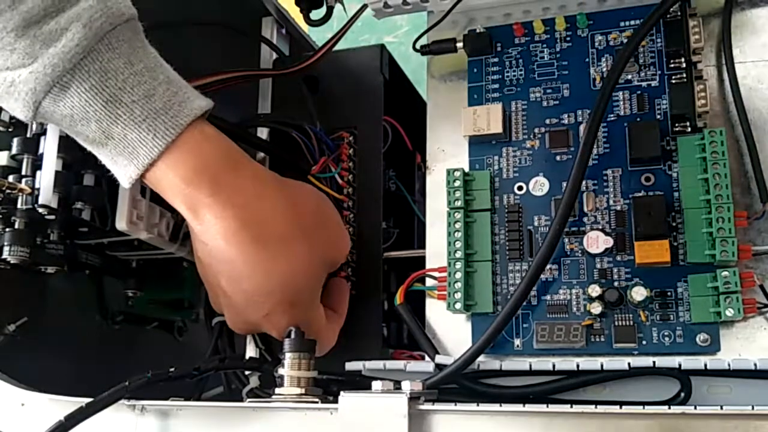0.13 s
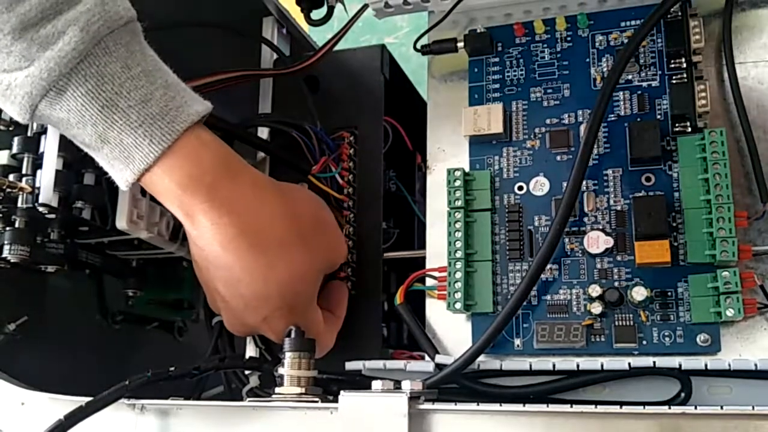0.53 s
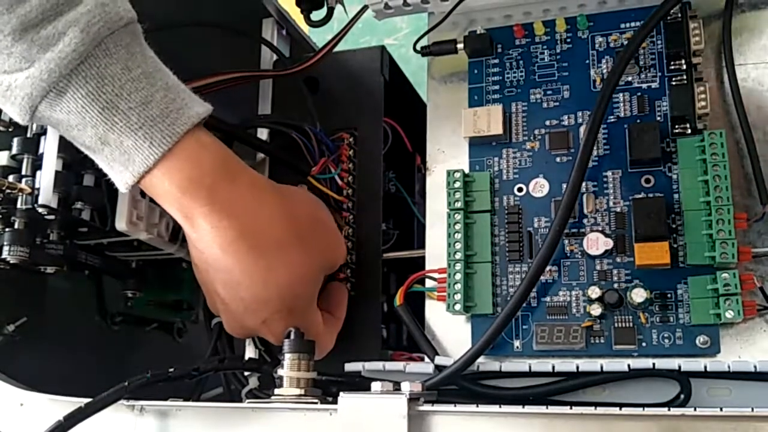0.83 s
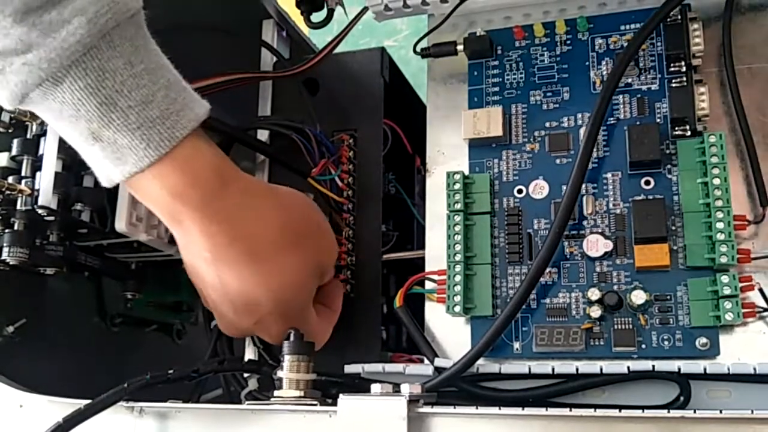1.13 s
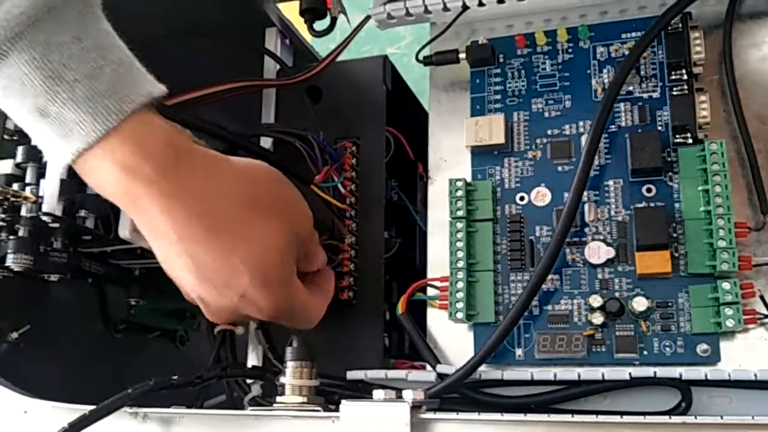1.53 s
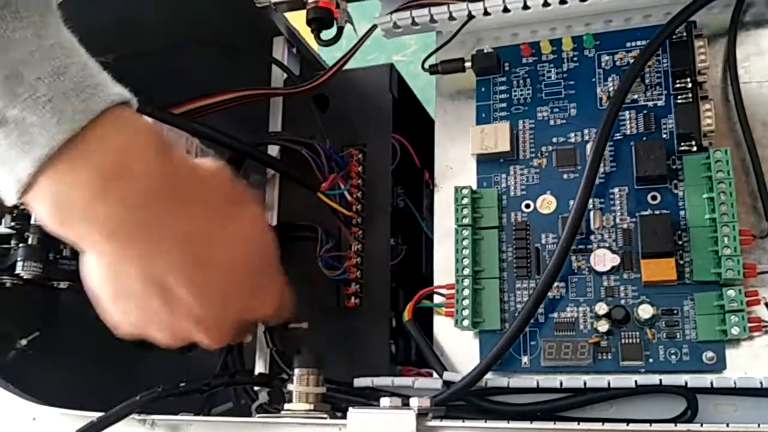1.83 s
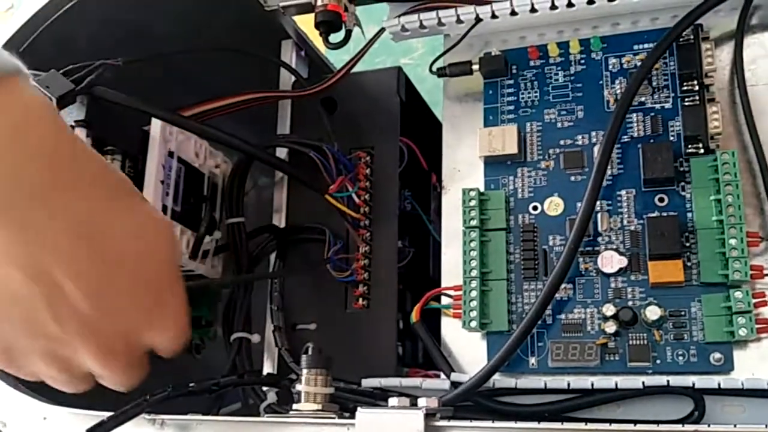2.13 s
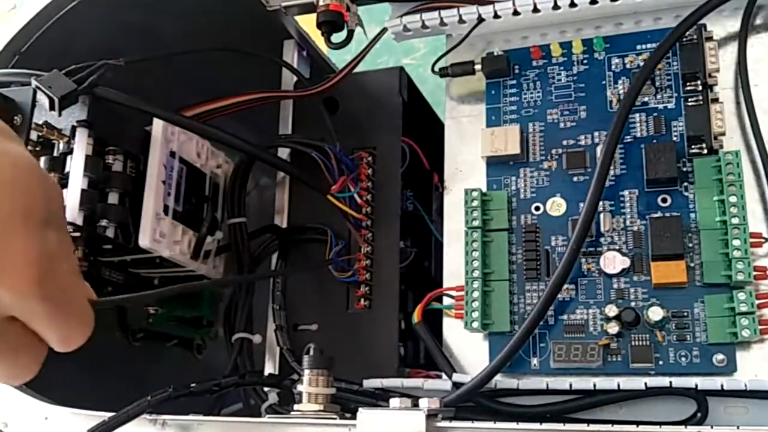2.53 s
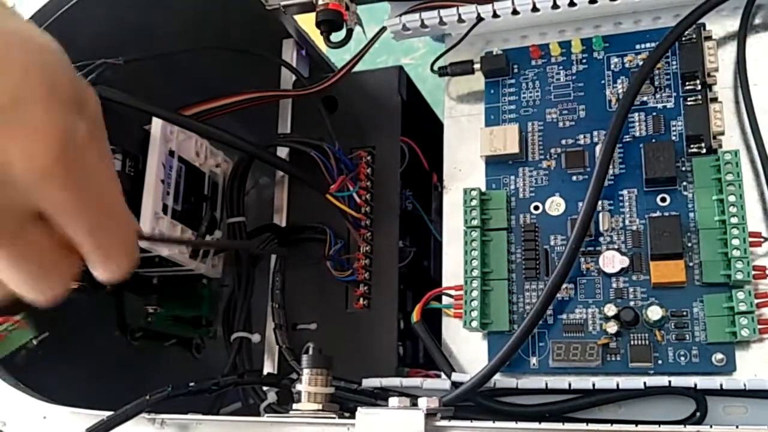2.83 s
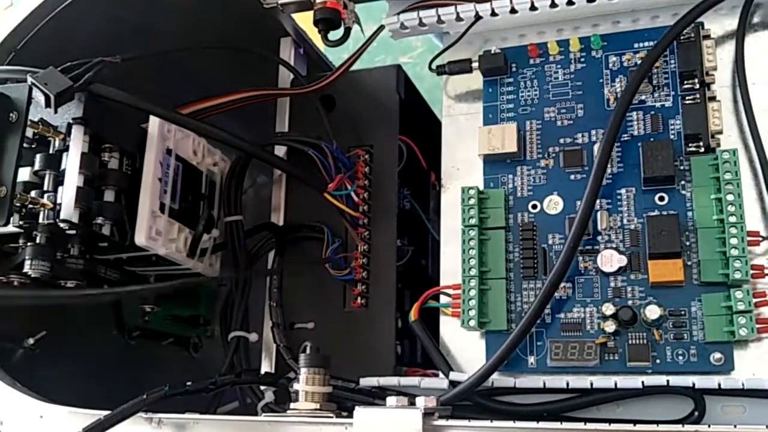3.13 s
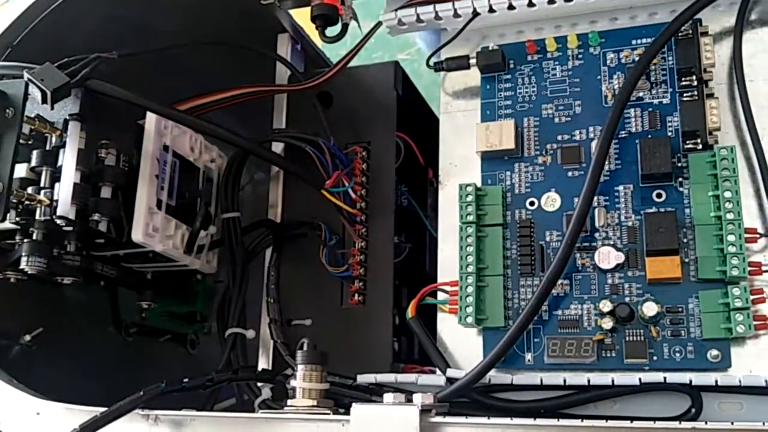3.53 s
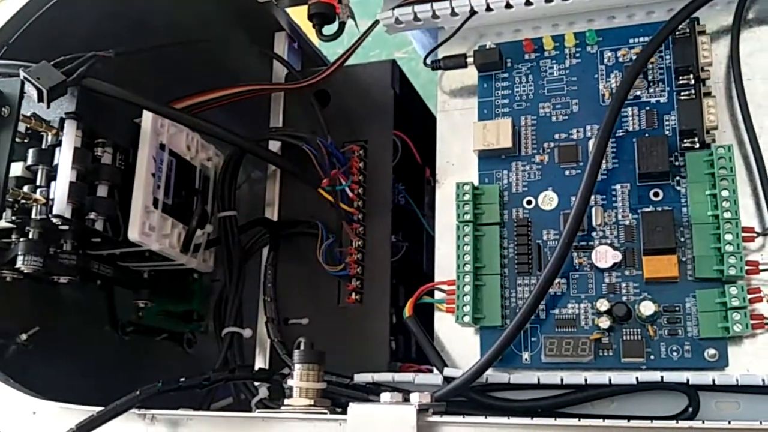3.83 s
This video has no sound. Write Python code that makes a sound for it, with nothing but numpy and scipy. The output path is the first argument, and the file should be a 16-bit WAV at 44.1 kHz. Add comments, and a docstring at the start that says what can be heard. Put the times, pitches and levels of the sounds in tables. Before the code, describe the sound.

Clacks and clunks of parts handled in a sheet-metal cabinet, close up in a reverberant workshop. Low rumble with a faint unsteady hum runs alone until 1.7 s. Light ticks and sleeve rustle come at 1.8-1.9 s, a quick loose clatter at 2.02 s, soft hollow nudges at 2.5 and 2.7-2.8 s, a sharp loud snap at 3.08 s, then rattling clunks at 3.62 and 3.78 s as the rumble grows quieter.

```python
"""Inside a sheet-metal machine cabinet in a workshop, a hand works over a steady rumble and hum (shaped
noise and a drifting sine). Sleeve and wires brush as noise of uneven level; then come light ticks and a faint
nudge, a loose clatter, more soft nudges and ticks, one sharp snap and two rattling clunks as parts are let go.
Each contact rings a dense cloud of short modes, most parts adding clear decaying sines; short pings at hard
contacts each ring one narrow noise band. The room answers contacts and pings with a tail of decaying noise."""
import sys
import numpy as np
from scipy import signal
from scipy.fft import rfft, irfft
from scipy.io import wavfile
from scipy.ndimage import uniform_filter1d, minimum_filter1d, map_coordinates

SR = 44100
rng = np.random.default_rng(int(sys.argv[2]) if len(sys.argv) > 2 else 0)


def pcm_store(signal):
    """Save signal as 16-bit PCM."""
    levels = np.round(np.clip(np.atleast_2d(signal), -1, 1) * 32767)
    wavfile.write(sys.argv[1], SR, levels.astype(np.int16).T)


N = 176400  # samples: 4 s


def amp(db):
    """Decibel law: 20 dB is a factor of ten in amplitude."""
    return 10 ** (np.asarray(db) / 20)


def unit(x):
    """Normalisation to a root-mean-square of 1."""
    return x / np.sqrt(np.mean(x ** 2) + 1e-20)


def along(points, hz):
    """Logarithmic frequency scale: interpolate (frequency [Hz], value) points along it."""
    f, v = np.transpose(points)
    return np.interp(np.log(hz + 1), np.log(f + 1), v)


def curve(rows):
    """Envelope: (time [s], value) points joined by straight lines, one value per sample."""
    return np.interp(np.arange(N) / SR, *np.transpose(rows))


def wobble(rate):
    """Slow random modulation: a smooth curve through `rate` random knots a second."""
    knots = rng.standard_normal(int(N * rate / SR) + 4)
    return map_coordinates(knots, [np.arange(N) * rate / SR])


def add(track, s, sound):
    """Superposition: mix a sound into the track at s seconds."""
    target = track[:, round(s * SR):][:, :sound.shape[1]]
    target += sound[:, :target.shape[1]]


def spread(pair, alike):
    """Interaural coherence: mid and side mixed from two unrelated signals set the left-right likeness."""
    size = pair.shape[1]
    likeness = along(alike, np.fft.rfftfreq(size, 1 / SR))
    turn = np.arccos(np.clip(likeness, -1, 1)) / 2
    mid, side = irfft(rfft(pair) * [np.cos(turn), np.sin(turn)], size)
    return np.array([mid + side, mid - side])


def noise(colour, alike):
    """Spectral shaping: white noise weighted by a density curve, in stereo, rms 1."""
    weight = amp(along(colour, np.fft.rfftfreq(N, 1 / SR)))
    spectrum = rfft(rng.standard_normal((2, N))) * weight
    return unit(spread(irfft(spectrum, N), alike))


# workshop air spectrum: (frequency [Hz], relative density [dB per Hz])
AIR_COLOUR = [(13, -35), (22, -14.5), (44, -2.5), (113, -3), (170, -1), (328, -10.5), (366, -14),
              (443, -11.5), (481, -12), (522, -12.5), (745, -19.5), (877, -18), (1090, -25), (1290, -17.5),
              (1430, -22), (1690, -19.5), (1990, -23.5), (4270, -31.5), (15000, -86)]
# workshop air: (frequency [Hz], left-right likeness [-1 to 1])
AIR_LIKENESS = [(40, .99), (150, 0.98), (300, 0.88), (600, 0.39), (1200, 0), (4000, 0)]
# background level, before a slight tilt to the right: (time [s], level [dB])
BACKGROUND_LEVEL = [(0, -32), (1.7, -32), (2.7, -33), (3.06, -32), (3.13, -37.5), (3.55, -36.5),
                    (3.7, -39.5), (4, -39.5)]
# machine hum, about which pitch and level drift: (frequency [Hz], level over the air [dB])
HUM_TONES = [(486, -13.5)]


def workshop():
    """Broadband noise plus a tone with slow frequency and amplitude modulation: rumble and unsteady hum."""
    hum = 0
    for hz, db in HUM_TONES:
        level = amp(db + 0.88 * wobble(4.1)) * np.sqrt(2)
        drifting_hz = hz + 1.4 * wobble(8.4)
        hum = hum + level * np.sin(2 * np.pi * np.cumsum(drifting_hz) / SR)
    background = noise(AIR_COLOUR, AIR_LIKENESS) + hum
    return amp(curve(BACKGROUND_LEVEL)) * background * amp([[-.3], [.3]])


# sleeve and wires: (time [s], level [dB])
RUSTLE_LEVEL = [(1.6, -65), (1.8, -39.5), (1.98, -47), (2.25, -43.5), (2.6, -48.5), (2.73, -35),
                (2.85, -45.5), (3.05, -54), (3.15, -53.5)]
# stereo width of rustle, contacts and pings: (frequency [Hz], left-right likeness [-1 to 1])
RING_LIKENESS = [(250, 0.98), (600, 0.94), (920, 0.67), (1300, 0), (2000, 0.2), (4000, 0)]


def rustle():
    """Friction noise, its level modulated at random: sleeve and wires brush as the hand draws back."""
    # (frequency [Hz], relative density [dB per Hz])
    colour = [(300, -24), (900, 2.5), (2100, 2.5), (4000, -4.0), (7500, -30.0), (10000, -40.5), (14000, -36.5)]
    unevenness = amp(3.3 * wobble(34.92) + 1.8 * wobble(300))
    return amp(curve(RUSTLE_LEVEL)) * unit(noise(colour, RING_LIKENESS) * unevenness)


BASS_RINGS = 0.022  # power by which low modes outlast high ones


def cloud(grain, colour, treble_db, t60):
    """High modal density: half-octave noise bands struck at once, each with its own energy and decay."""
    size = grain.shape[1]
    t, hz = np.arange(size) / SR, np.fft.rfftfreq(size, 1 / SR)
    tilt_db = treble_db * along([(1500, 0), (7000, 1)], hz)
    gain = unit(amp(along(colour, hz) + tilt_db))
    white, out = rfft(spread(grain, RING_LIKENESS)), np.zeros((2, size))
    onset = 1 - np.exp(-(t / .0004) ** 2)
    for low in 125 * 2 ** (np.arange(14) / 2):
        band = gain * (hz >= low) * (hz < low * np.sqrt(2))
        band_t60 = t60 * (1000 / low) ** BASS_RINGS
        fade = amp(-60 * t / band_t60) * onset
        energy = np.mean(band ** 2) * np.mean(fade ** 2)
        out += unit(irfft(white * band) * fade) * np.sqrt(energy)
    return out


# room tail: (frequency [Hz], reverberation time to -60 dB [s])
REVERBERATION = [(200, 0.79), (900, 0.98), (2200, 1), (5000, 0.71), (12000, 0.44)]


def room(x):
    """Reverberation: convolution with noise in which each frequency dies at its own speed."""
    hz, t, z = signal.stft(rng.standard_normal((2, SR)), SR, nperseg=256)
    decay = amp(-60 * t / along(REVERBERATION, hz)[:, None])
    build_up = 1 - np.exp(-t / 0.0023)
    tail = signal.istft(z * decay * build_up, SR, nperseg=256)[1]
    return signal.fftconvolve(x, tail / np.linalg.norm(tail[0]), axes=1)


SAME_RING = 0.63  # share of ring energy that repeats from contact to contact


def part(contacts, colour, modes, modes_db, room_db, pan_db, attack_s):
    """Modal superposition: each contact excites a mode cloud, clear modes and the room; pan_db is left over right."""
    out = np.zeros((2, N))
    body = rng.standard_normal((2, 16384))
    t = np.arange(body.shape[1]) / SR
    pan = np.array([[pan_db], [-pan_db]]) / 2
    for s, db, treble_db, t60 in contacts:
        fresh = rng.standard_normal(body.shape)
        grain = np.sqrt(SAME_RING) * body + np.sqrt(1 - SAME_RING) * fresh
        ring = cloud(grain, colour, treble_db, t60)
        for k, (hz, level, life) in enumerate(modes):
            # opposite phase shifts left and right give the mode its stereo likeness
            apart = (-1) ** k * np.arccos(np.clip(along(RING_LIKENESS, hz), -1, 1)) / 2
            phase = 2 * np.pi * hz * t + rng.normal(0, 0.66) + np.array([[apart], [-apart]])
            mode_db = modes_db + level + rng.normal(0, 2.46) - 60 * t / life
            ring = ring + amp(mode_db) * np.sin(phase) * (1 - np.exp(-t / 0.0013))
        ring = ring * amp(db + pan) * (1 - np.exp(-t / attack_s))
        add(out, s, ring)
        add(out, s, amp(room_db) * room(ring))
    return out


# light contacts of small parts: (time [s], level [dB], treble tilt [dB], t60 near 1 kHz [s])
TICK_CONTACTS = [(1.802, -31, -10, .04), (1.832, -31, 6.5, 0.096), (1.905, -25.5, -10, 0.06),
                 (1.910, -29, 7, 0.063), (1.920, -28, -6, .1), (2.708, -40, -6, .08), (2.754, -30, -12, .1)]
# cloud spectrum: (frequency [Hz], relative density [dB per Hz])
TICK_SPECTRUM = [(200, -32), (700, -7.5), (1300, -4), (2600, 2), (3900, -3.5), (4900, -13.5), (6200, -11),
                 (9000, -29.5), (15000, -26)]


def ticks():
    """Impact on small bodies: dense modes alone, without clear tones."""
    return part(TICK_CONTACTS, TICK_SPECTRUM, [], modes_db=0, room_db=-11, pan_db=-2.0, attack_s=0.00062)


# short pings at hard contacts: (time [s], level [dB], pitch [Hz], t60 near 1 kHz [s])
HARD_PINGS = [(1.827, -31, 4200, 0.06), (1.9055, -29.5, 1440, 0.076), (1.909, -41, 9300, 0.033),
              (2.0197, -16.5, 3650, 0.022), (1.918, -30, 2700, .06), (2.027, -20, 1990, .025),
              (2.042, -23, 560, .05), (2.058, -22, 2500, 0.049), (2.865, -30, 2060, .04),
              (2.896, -47, 12000, .08), (3.0802, -19, 3960, 0.022), (3.0857, -8, 1900, 0.02),
              (3.6237, -10, 3070, 0.028), (3.779, -14.5, 1420, 0.046)]
PING_OCTAVES, PING_SKIRT_DB = 0.34, -29  # reach either side of the pitch, and relative density there
PING_ROOM_DB = -12


def pings():
    """Narrow-band resonance: each short ping at a hard contact rings one noise band briefly, then the room."""
    out = np.zeros((2, N))
    reach = 2 ** PING_OCTAVES
    for s, db, hz, t60 in HARD_PINGS:
        colour = [(hz / reach ** 3, -80), (hz / reach, PING_SKIRT_DB), (hz, 0),
                  (hz * reach, PING_SKIRT_DB), (hz * reach ** 3, -80)]
        ring = cloud(rng.standard_normal((2, 8192)), colour, 0, t60)
        add(out, s, amp(db) * ring)
    return out + amp(PING_ROOM_DB) * room(out)[:, :N]


# soft contacts with a hollow part: (time [s], level [dB], treble tilt [dB], t60 near 1 kHz [s])
NUDGE_CONTACTS = [(1.831, -29.5, -8, 0.033), (2.482, -28.5, -2, 0.12), (2.493, -20.5, -4.5, 0.11),
                  (2.704, -28, -9.5, 0.069), (2.775, -28.5, -5, 0.11), (3.039, -29.5, -4, 0.18)]
# cloud spectrum: (frequency [Hz], relative density [dB per Hz])
NUDGE_SPECTRUM = [(300, -15), (740, -16), (920, 6.5), (1150, -14), (1600, -8), (2000, -1.5), (2700, -17),
                  (4200, -20), (8000, -43), (13000, -38)]
# clear modes: (frequency [Hz], relative level [dB], t60 [s])
NUDGE_TONES = [(854, -10, 0.076), (905, 8, 0.093), (1950, -10.5, 0.19)]


def nudges():
    """Soft impact: on a hollow part, a slower rise rounds the onset of the modes."""
    return part(NUDGE_CONTACTS, NUDGE_SPECTRUM, NUDGE_TONES,
                modes_db=-7, room_db=-21, pan_db=-2.5, attack_s=0.0018)


# contacts of a loose part: (time [s], level [dB], treble tilt [dB], t60 near 1 kHz [s])
CLATTER_CONTACTS = [(2.023, -16, -7, 0.042), (2.0275, -16, -2.5, 0.057), (2.0415, -17.5, -1.5, 0.089),
                    (2.0585, -19.5, -2, 0.064), (2.067, -25.5, 2, 0.11), (2.077, -22.5, -2.5, 0.11),
                    (2.094, -27.5, -3, 0.13)]
# cloud spectrum: (frequency [Hz], relative density [dB per Hz])
CLATTER_SPECTRUM = [(150, -28), (350, -12), (600, 0), (800, -14), (1050, -15.5), (1250, -10), (2000, -1),
                    (2500, -5.5), (3800, -8), (5500, -21), (9000, -38), (15000, -42)]
# clear modes: (frequency [Hz], relative level [dB], t60 [s])
CLATTER_TONES = [(286, -2, 0.41), (672.4, -11, 0.35), (1208, -4, 0.29), (1390, -4, 0.11), (1730, -7, .2),
                 (1975, 1, 0.14), (2180, -2.5, 0.21), (2800, -7, .2)]


def clatter():
    """Repeated impact: a loose part strikes in quick succession and its modes overlap."""
    return part(CLATTER_CONTACTS, CLATTER_SPECTRUM, CLATTER_TONES,
                modes_db=-11.5, room_db=-8.5, pan_db=-1.0, attack_s=0.00011)


# a stiff part snapping home: (time [s], level [dB], treble tilt [dB], t60 near 1 kHz [s])
SNAP_CONTACTS = [(3.0807, -6.5, -3, 0.019), (3.0855, -9, 2, 0.065)]
# cloud spectrum: (frequency [Hz], relative density [dB per Hz])
SNAP_SPECTRUM = [(200, -52), (700, -17), (1350, -9.5), (1850, 0.5), (2700, -3), (3300, -12), (4000, -16.5),
                 (5200, -31.5), (6500, -30), (8000, -67), (14000, -51)]
# clear modes: (frequency [Hz], relative level [dB], t60 [s])
SNAP_TONES = [(1605, -0.5, 0.17), (1850, -9, 0.2), (2030, 3.5, 0.076), (2294, -6, 0.14), (2680, -10, 0.19),
              (2750, -2, .22), (3990, -11.5, 0.12)]


def snap():
    """Hard impact: a stiff part snaps home with two contacts of very short rise."""
    return part(SNAP_CONTACTS, SNAP_SPECTRUM, SNAP_TONES,
                modes_db=-13.5, room_db=-17.0, pan_db=-1.5, attack_s=0.00012)


# heavy parts on the cabinet: (time [s], level [dB], treble tilt [dB], t60 near 1 kHz [s])
CLUNK_CONTACTS = [(3.6228, -8, -3, 0.047), (3.627, -13.5, 10.5, 0.066), (3.674, -18, 1.5, 0.07),
                  (3.696, -20.5, 1, 0.1), (3.7785, -9, -17, 0.066), (3.785, -16, 0, 0.077),
                  (3.811, -19, 2.5, 0.07), (3.828, -21, 3.5, 0.086)]
# cloud spectrum: (frequency [Hz], relative density [dB per Hz])
CLUNK_SPECTRUM = [(120, -31), (225, -19), (280, 4.5), (420, -7.5), (590, 1), (760, -6.5), (960, -1),
                  (1130, -18), (1900, -4.5), (2450, -17.5), (3300, -11.5), (3850, -19.5), (4400, -17),
                  (5300, -30.5), (7000, -32), (9800, -46.5), (14000, -42)]
# clear modes: (frequency [Hz], relative level [dB], t60 [s])
CLUNK_TONES = [(263, 1, 0.13), (352, -6, .12), (534, -5, 0.12), (636, -4.5, 0.17), (770, -7, 0.11),
               (939, -0.5, 0.057), (1460, -8, 0.12), (1900, -10, 0.11), (2050, -3, 0.16), (4355, -17, 0.23)]


def clunks():
    """Impact and rebound: heavy parts knock on the cabinet, exciting its low modes, and rattle."""
    return part(CLUNK_CONTACTS, CLUNK_SPECTRUM, CLUNK_TONES,
                modes_db=-11.5, room_db=-15.0, pan_db=-1.5, attack_s=0.00047)


def scene():
    """Linear superposition of all sources."""
    return workshop() + rustle() + ticks() + pings() + nudges() + clatter() + snap() + clunks()


PEAK_LIMIT = .72  # amplitude held before the low-pass
TOP_HZ = 15600


def record(dry):
    """Peak limiting and low-pass filtering: gain dips about 1 ms around loud peaks; a steep filter cuts the top."""
    need = np.minimum(1, PEAK_LIMIT / (np.abs(dry).max(axis=0) + 1e-9))
    gain = uniform_filter1d(minimum_filter1d(need, size=45), size=45)
    low_pass = signal.butter(30, TOP_HZ, fs=SR, output="sos")
    return signal.sosfilt(low_pass, dry * gain)


dry = scene()
out = record(dry)
pcm_store(out)
```